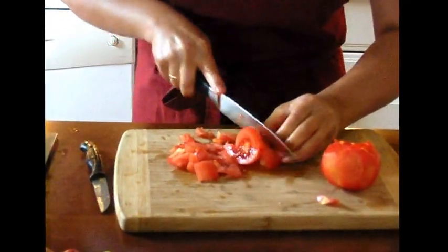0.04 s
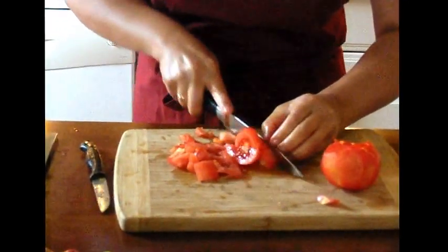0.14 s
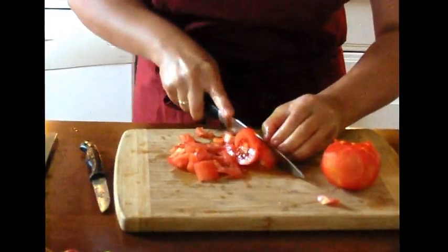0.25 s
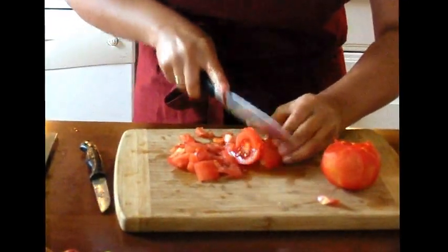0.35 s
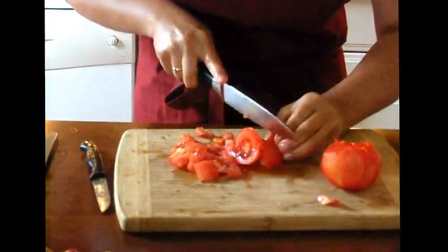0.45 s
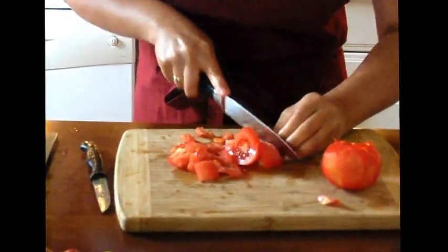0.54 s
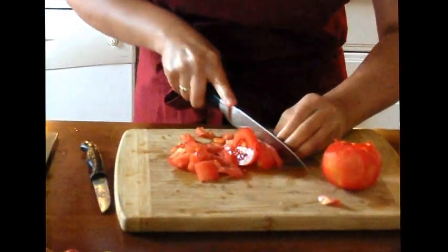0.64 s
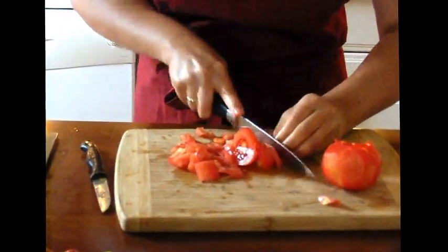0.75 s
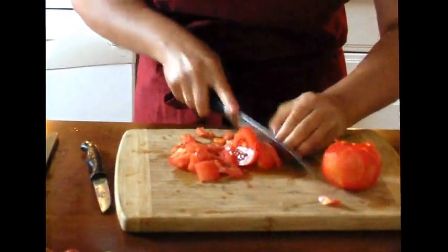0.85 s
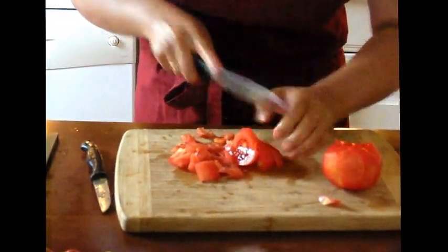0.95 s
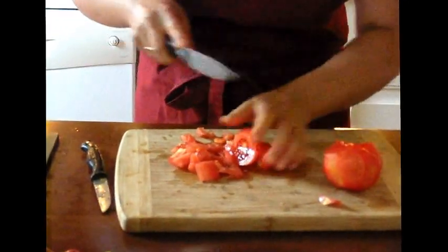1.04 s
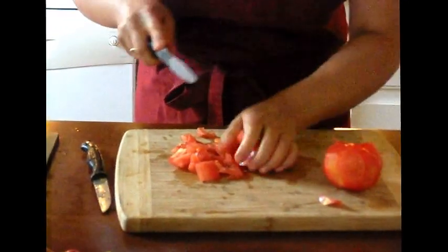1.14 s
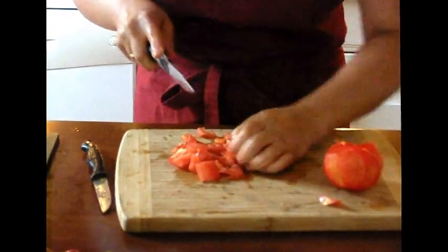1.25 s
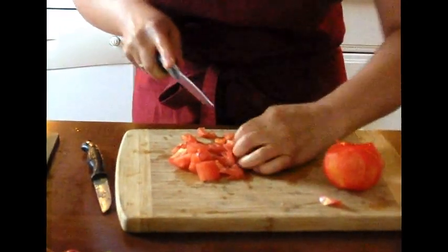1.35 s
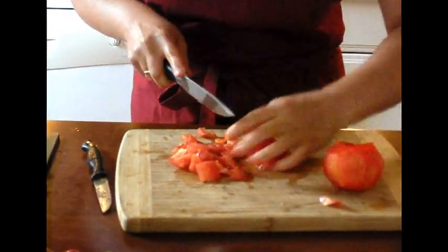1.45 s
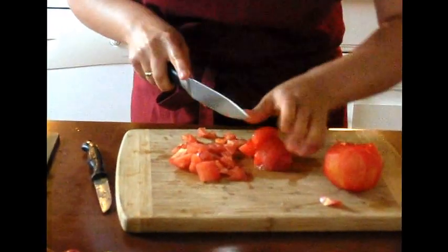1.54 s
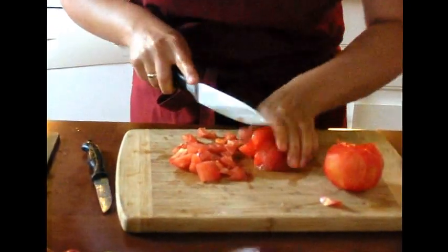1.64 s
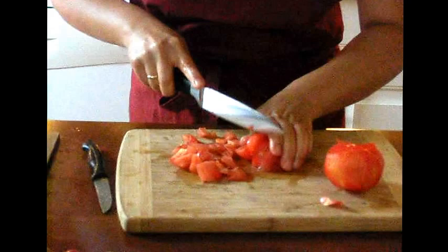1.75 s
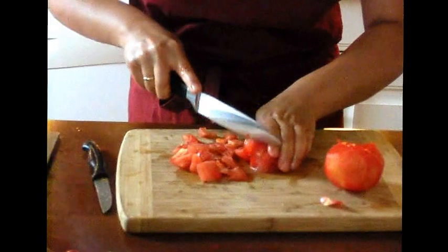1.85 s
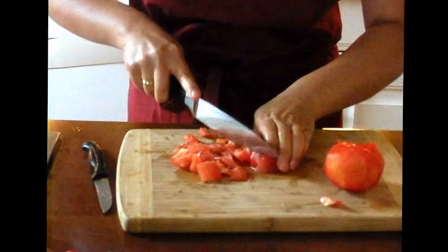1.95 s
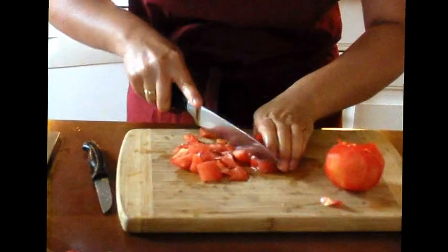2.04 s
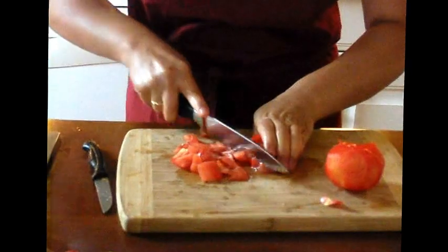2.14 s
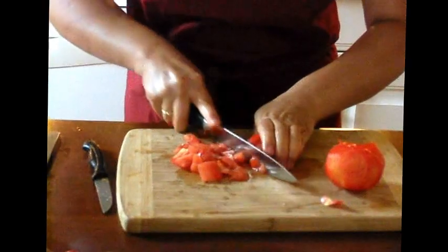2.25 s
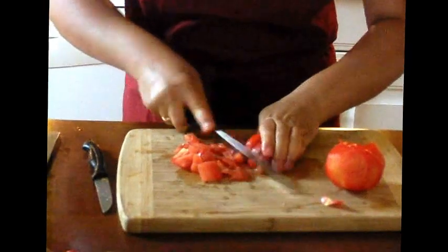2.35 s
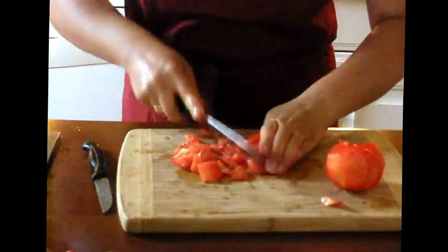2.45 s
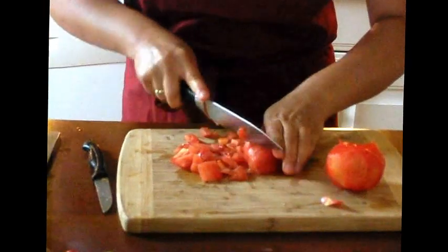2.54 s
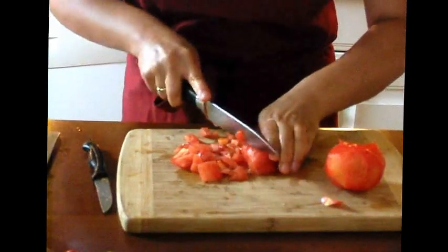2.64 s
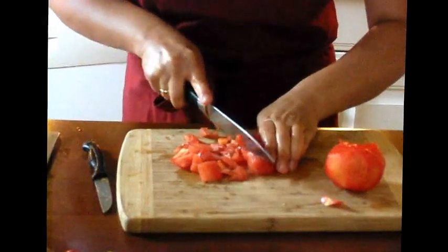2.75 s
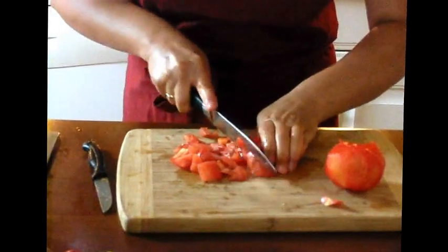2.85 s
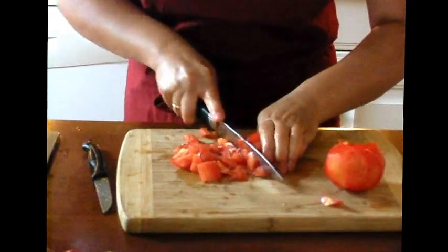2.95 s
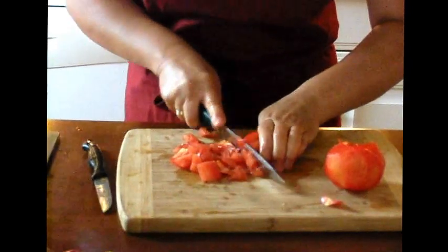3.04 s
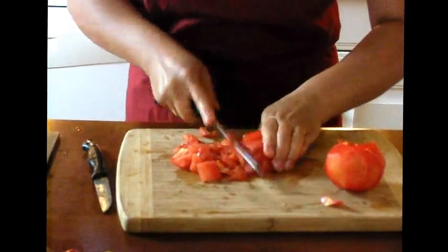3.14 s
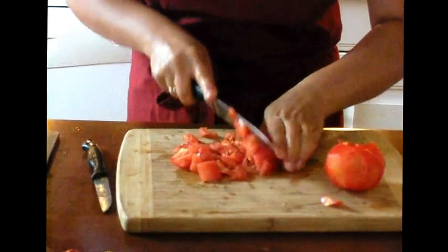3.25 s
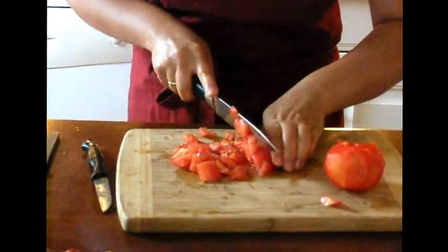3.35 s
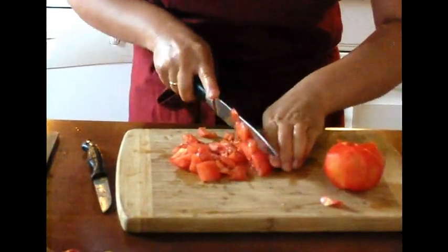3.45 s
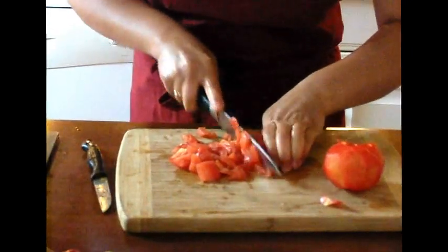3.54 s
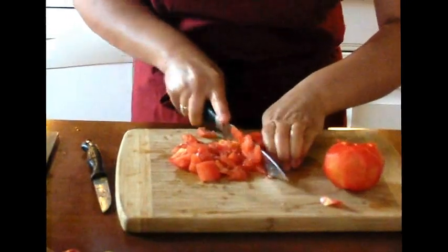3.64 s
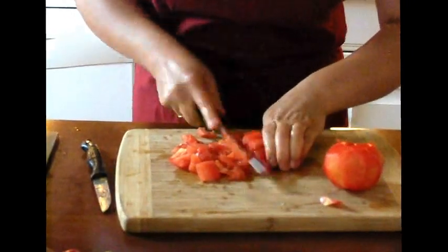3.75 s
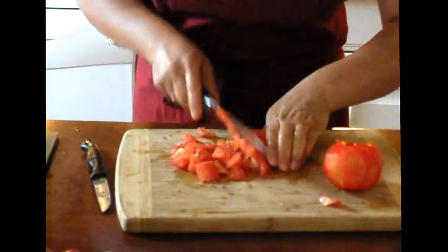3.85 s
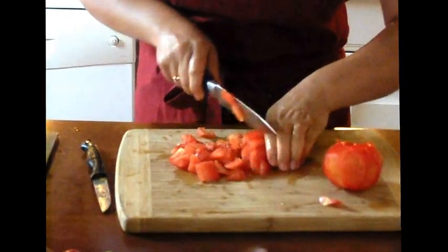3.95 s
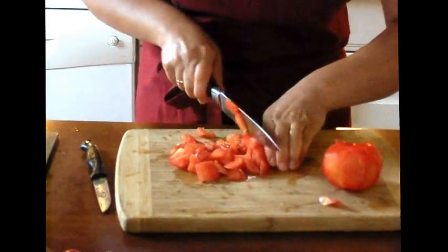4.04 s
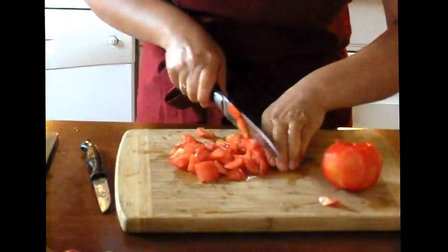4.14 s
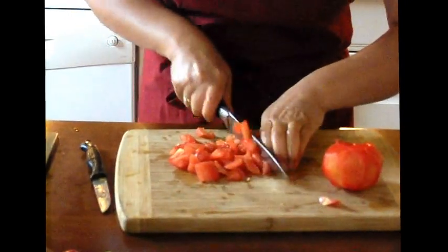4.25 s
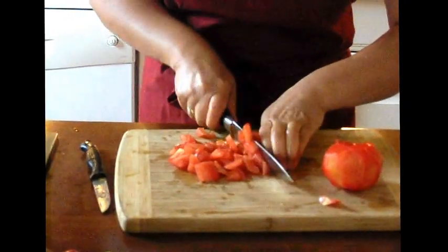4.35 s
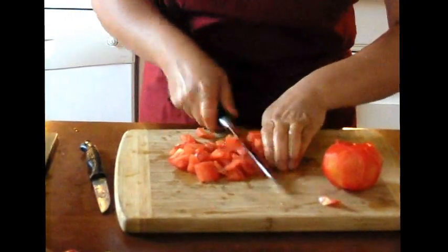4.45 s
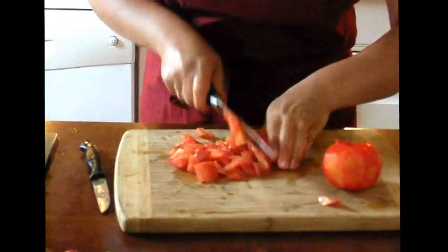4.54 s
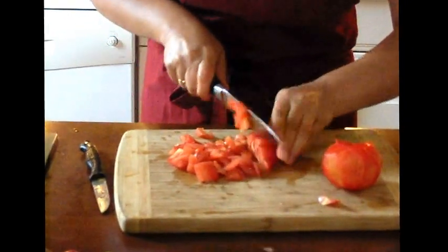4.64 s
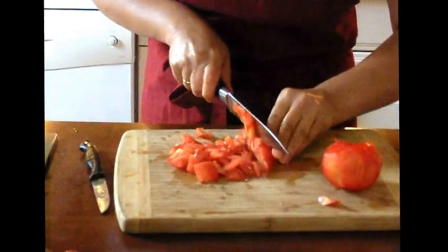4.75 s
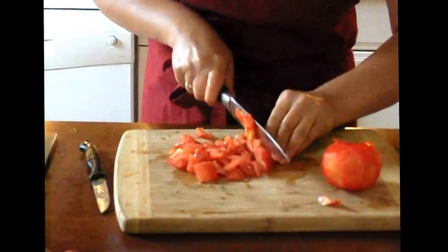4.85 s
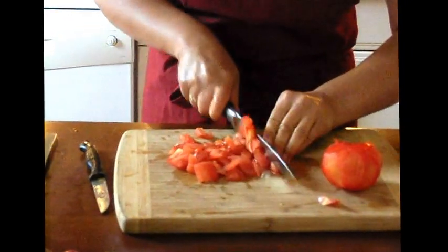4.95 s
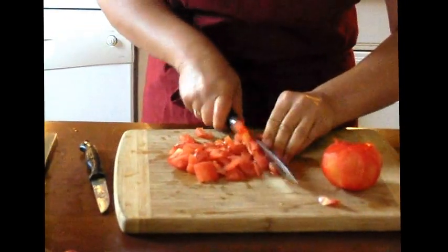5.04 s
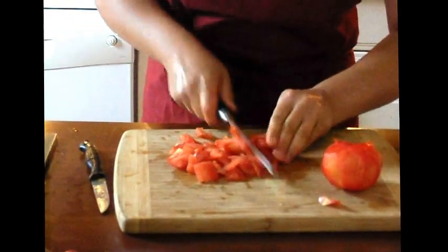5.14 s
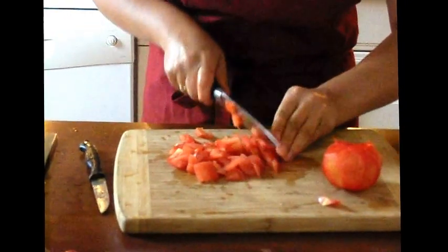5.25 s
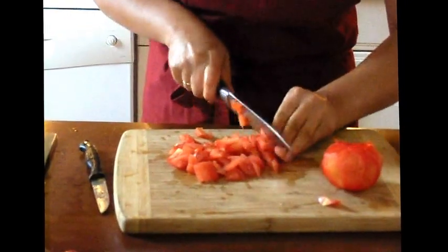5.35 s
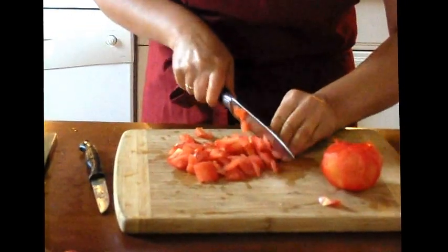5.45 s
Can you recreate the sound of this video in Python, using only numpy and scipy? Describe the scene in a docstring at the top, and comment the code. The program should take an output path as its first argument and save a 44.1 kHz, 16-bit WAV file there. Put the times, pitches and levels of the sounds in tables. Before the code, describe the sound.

A chef's knife dices a tomato on a wooden cutting board in a small, hard-walled kitchen. Each stroke is a brief wet rasp through skin and pulp, ending in a wooden knock that rings shortly in the room. The first knock, at about 0.2 seconds, is the loudest and brightest, with a tiny squeak of skin on steel. A duller one follows at 0.8 seconds. Then comes a pause with only faint wet sounds. Cutting resumes with a soft knock at 2.3 seconds, firmer ones at 3.0 and 3.7, and two quiet, cushioned ones at 4.4 and 5.1, the rasps growing slightly longer. Between strokes, juicy pieces peel off the blade with faint smacks, small pops and squeaks, the last around 5.2 seconds. A low steady rumble with a faint hiss lies underneath throughout.

```python
"""Dicing a tomato

A chef's knife cuts on a wooden board in a small, hard-walled kitchen. Each stroke rasps
through skin and pulp, then the edge knocks on the board; wet pieces smack as the blade
lifts. The room rings after every knock, over a low steady rumble."""
import sys
import numpy as np
from scipy import signal
from scipy.fft import rfft, irfft, next_fast_len
from scipy.io import wavfile
from scipy.ndimage import uniform_filter1d

SR = 44100
rng = np.random.default_rng(int(sys.argv[2]) if len(sys.argv) > 2 else 0)


def bounce(signal):
    """Save signal as a 16-bit WAV file at the path given by the first command-line argument."""
    frames = np.transpose(np.atleast_2d(signal))
    limited = np.clip(frames, -1, 1)
    pcm = np.round(limited * 32767).astype(np.int16)
    wavfile.write(sys.argv[1], SR, pcm)


N = 242682

# Edge meets board: (time [s], level [dB], cushion corner [Hz], board pitch [factor],
# blade flex [Hz], flex [dB], edge tick [dB], thump of the hand's weight [dB])
KNOCKS = [(0.2233, 0.5, 3800, 0.96, 2011, 1.5, -28.5, -14),
          (0.8077, -9, 1730, 0.89, 1934, 0.5, -35.5, -14.5),
          (2.3286, -15.5, 1274, 0.92, 1730, -6, -29, -23), (3.0270, -8.5, 1350, 0.92, 1615, -11, -36, -28),
          (3.704, -6, 1800, 0.92, 1378, -11, -35, -17), (4.389, -20.5, 1320, 0.906, 2840, 14, -28, -24),
          (5.0824, -19.5, 1170, 0.97, 1510, -31, -34, -23)]


def knocks(strike_db=30, tick_s=0.0015, tick_hz=6000, radiate_hz=230, thump_hz=270,
           worktop_db=-2, room_db=-1.5, tick_room_db=-9):
    """The edge strikes the board; pulp under it cushions the blow and cuts the treble."""
    # Board modes: (frequency before pitch factor [Hz], width [Hz], level [dB])
    board_modes = [(450, 100, -10.5), (591.4, 120, -4.5), (813, 121, 0.5), (956, 190, -13.5),
                   (1075, 90, -20), (1502, 130, -6), (1652, 120, -5), (1950, 207, -5.5), (2368, 26, -6.5),
                   (2599, 67, 1.5), (2600, 120, -0.5), (2872, 250, -3.5), (3360, 100, -3.5),
                   (3800, 290, -9.5), (4260, 240, -12), (4870, 500, -19)]
    # Board antiresonances: (frequency before pitch factor [Hz], width [Hz])
    board_nulls = [(1200, 87), (2210, 160)]
    # Worktop modes, driven by the board: (frequency [Hz], level [dB], T60 [s])
    worktop_modes = [(568, -66.5, .4), (620, -60, 0.31), (665, -45, 0.11), (736, -63.5, 0.21),
                     (760, -65.5, .5), (912, -61.5, 0.83), (1320, -70.5, 0.2), (1497, -59, 0.46),
                     (1619, -62.5, .4), (2426, -65, 0.19), (3140, -56.5, .3), (3250, -54.5, 0.12)]
    out, t = np.zeros(N), np.arange(SR // 2) / SR
    worktop = sum(amp(worktop_db + db - 60 * t / t60_s) * np.cos(2 * np.pi * hz * t)
                  for hz, db, t60_s in worktop_modes)
    radiation = signal.butter(1, radiate_hz, "high", fs=SR, output="sos")  # small board, little bass
    for s, db, corner_hz, pitch, flex_hz, flex_db, tick_db, thump_db in KNOCKS:
        # Adjacent modes alternate in sign: the knock swells over its first cycle.
        body = sum((-1) ** k * amp(mode_db) * ring(t, hz * pitch, width_hz)
                   for k, (hz, width_hz, mode_db) in enumerate(board_modes))
        body += amp(flex_db) * ring(t, flex_hz, width_hz=99)
        body += amp(thump_db) * ring(t, thump_hz, width_hz=136)
        body += signal.fftconvolve(body, worktop)[:len(t)]
        for hz, width_hz in board_nulls:
            body = signal.lfilter(*signal.iirnotch(hz * pitch, hz / width_hz, fs=SR), body)
        cushion = signal.butter(3, corner_hz, fs=SR, output="sos")
        wood = amp(db + strike_db) * signal.sosfilt(np.vstack([cushion, radiation]), body)
        grit = noise(len(t), lambda hz: hump(hz, tick_hz, octaves=0.76))
        tick = amp(db + tick_db) * grit * swell(t, tick_s)
        add(out, s, wood + tick)
        send = amp(room_db) * wood + amp(tick_room_db) * tick
        add(out, s, signal.fftconvolve(send, kitchen()))  # each spot has its own echoes
    return out


def slicing(level_db=-1, skin_hz=12500, skin_db=5, pulp_db=-7, dulling_s=0.06, bite_s=0.019,
            ease_db_per_s=131, stop_db_per_s=229.5, uneven_db=0.74, uneven_hz=60.3):
    """Skin snaps, then cells burst in a rasp that grows and dulls with depth until the board stops it."""
    # Cut before each knock: (length [s], deepest point [fraction], deepest rasp [dB], entry rasp [dB],
    # skin snap [dB], scrape of skin on steel [Hz], scrape width [octaves], scrape gain [dB])
    cuts = [(0.1, 1, -38.5, -69, -72, 2940, .3, -3), (0.075, 1, -46.5, -65, -68, 6600, .33, -2.5),
            (.092, 1, -43.5, -56.5, -63, 20000, .47, -1), (.125, 0.76, -41.5, -64, -68, 11200, 0.15, -2),
            (.133, .8, -43, -55.5, -53, 7300, 0.28, 4), (.145, 0.61, -41, -55, -57, 3200, 0.29, 4.5),
            (.158, 0.58, -39.5, -58, -62, 5700, 0.18, 5)]
    # Rasp spectrum: (frequency [Hz], gain [dB])
    rasp_colour = [(400, 7.5), (1200, 0), (2500, -1), (4500, -2.5), (7000, -1), (10000, -4), (12000, -8),
                   (15500, -8.5)]
    out, t = np.zeros(N), np.arange(SR // 3) / SR
    bursts = crackle(per_s=5000, spread_db=2.5, cycles=13, fizz=0.99)
    for (knock_s, *_), cut in zip(KNOCKS, cuts):
        length_s, depth, deep_db, entry_db, snap_db, scrape_hz, octaves, scrape_db = cut
        start_s, deepest_s = knock_s - length_s, depth * length_s
        cells = patchy(bursts[rng.integers(N - len(t)):][:len(t)])
        colour = lambda hz: amp(read(rasp_colour, hz) + scrape_db * hump(hz, scrape_hz, octaves))
        rasp = unit(shaped(cells, colour))
        treble = shaped(rasp, lambda hz: hump(hz, skin_hz, octaves=0.47))
        treble_db = np.interp(t, [0, deepest_s, deepest_s + dulling_s], [skin_db, 0, pulp_db])
        rasp += treble * (amp(treble_db) - 1)
        db = np.interp(t, [0, deepest_s], [entry_db, deep_db])
        db -= ease_db_per_s * np.maximum(t - deepest_s, 0)  # blade through
        db -= stop_db_per_s * np.maximum(t - length_s, 0)  # blade on the board
        db += uneven_db * noise(len(t), lambda hz: np.exp(-(hz / uneven_hz) ** 2))  # flesh yields in fits
        add(out, start_s, rasp * amp(level_db + db) * np.minimum(t / bite_s, 1))
        add(out, start_s, smack(bursts, snap_db, skin_hz, octaves=0.46, length_s=0.05))
    return out


def juice(level_db=-1, pop_octaves=0.496, pop_s=0.0077,
          stray_per_s=2.5, stray_db=-65, stray_spread_db=1.5, stray_hz=10500):
    """Juice films snap, bubbles burst and wet skin squeaks as pieces stick to the blade and let go."""
    # Wet flesh peels off blade or board: (peak time [s], level [dB], centre [Hz], length [s])
    peels = [(.68, -56.5, 9050, .036), (1.339, -62, 6020, .16), (2.487, -51, 6000, .07),
             (2.887, -56.5, 8500, 0.049), (3.214, -50, 5500, .045), (3.876, -48.5, 7350, .022),
             (4.568, -50.5, 5820, .024), (5.228, -50.5, 6970, 0.029)]
    # Stick-slip of skin on steel: (peak time [s], level [dB], centre [Hz], length [s])
    squeaks = [(.219, -33, 2760, 0.022), (2.491, -49, 7530, .03), (3.22, -58.5, 9450, .05),
               (3.675, -52, 7800, 0.017), (3.65, -51, 1890, .15), (4.575, -53, 2010, 0.043),
               (4.972, -53, 14000, .045), (5.237, -53, 2195, .06)]
    # Loudest bubbles: (peak time [s], level [dB], centre [Hz])
    pops = [(.388, -44, 5900), (0.624, -57, 10000), (1.683, -59, 10100), (2.603, -59.5, 13900),
            (2.894, -54, 7000), (3.197, -49, 7500), (3.293, -62, 12450), (3.84, -48.5, 5900),
            (4.535, -54, 12500), (5.174, -48, 6760), (5.192, -48, 7460)]
    out = np.zeros(N)
    bursts = crackle(per_s=3600, spread_db=-1.5, cycles=15, fizz=0.45)
    for events, octaves in (peels, 1.56), (squeaks, 0.13):
        for s, db, hz, length_s in events:
            add(out, s - length_s / 2, smack(bursts, db, hz, octaves, length_s))
    for s, db, hz in pops:
        add(out, s - pop_s / 2, smack(bursts, db, hz, pop_octaves, pop_s))
    chances = rng.random((48, 2))  # fainter bubbles burst at random
    for (when, luck), (size, pitch) in zip(chances, rng.standard_normal(chances.shape)):
        hz = stray_hz * 2 ** (pitch * pop_octaves / 2)
        pop = smack(bursts, stray_db + stray_spread_db * size, hz, pop_octaves, pop_s)
        if luck * len(chances) < stray_per_s * N / SR:
            add(out, when * N / SR, pop)
    return amp(level_db) * out


def smack(bursts, db, centre_hz, octaves, length_s):
    """Short swell of wet crackle in one band, loudest midway."""
    # Dulling by wet pulp: (frequency [Hz], gain [dB])
    pulp_colour = [(2000, 10), (8000, -2.5), (11000, -3), (15500, -6)]
    piece = bursts[rng.integers(N - SR // 4):][:SR // 4]
    band = shaped(piece, lambda hz: hump(hz, centre_hz, octaves) * amp(read(pulp_colour, hz)))
    envelope = signal.windows.hann(int(length_s * SR))
    snap = band[:len(envelope)] * envelope
    return amp(db) * snap * np.linalg.norm(envelope) / np.linalg.norm(snap)


def crackle(per_s, spread_db, cycles, fizz):
    """Tiny cells and bubbles pop, each ringing briefly at its own pitch, over a fine fizz."""
    pops, t = np.zeros(N), np.arange(SR // 100) / SR
    pitches_hz = np.geomspace(1200, 16000, 36)
    for hz in pitches_hz:
        when, size, sign, luck = rng.random((4, N // 50))
        popping = luck * len(luck) < per_s * N / SR * hz / pitches_hz.sum()  # small bubbles are commonest
        gains = amp(spread_db * np.minimum(-np.log1p(-size), 4)) * np.sign(sign - 0.5)
        pop = unit(ring(t, hz, hz / cycles))
        indices = (when[popping, None] * (N - len(t))).astype(int) + np.arange(len(t))
        pops += np.bincount(indices.ravel(), np.outer(gains[popping], pop).ravel(), N)
    return unit(unit(pops) + fizz * rng.standard_normal(N))


def patchy(x, patch_db=2.5):
    """Cells burst in clumps: the colour shifts in patches of about 1 kHz by 20 ms."""
    spectra = signal.stft(x, nperseg=256)[2]
    patches = uniform_filter1d(rng.standard_normal(spectra.shape), size=6, axis=0)
    patches = uniform_filter1d(patches, size=7, axis=1)
    return signal.istft(spectra * amp(patch_db * unit(patches)), nperseg=256)[1][:len(x)]


def kitchen(taps_per_s=6000, near_db=-6, wall_s=0.0115, counter_s=0.0049, counter_db=-20):
    """Room response: counter echo and faint near scatter, then the walls' diffuse tail."""
    # Room decay: (frequency [Hz], T60 [s])
    room_t60 = [(200, 0.67), (700, 0.58), (1500, 0.57), (3500, 0.62), (6000, 0.52), (10000, 0.58),
                (15000, 0.24)]
    # Tail spectrum: (frequency [Hz], gain [dB])
    room_colour = [(150, 5.5), (450, -3), (750, -5.5), (1050, 1), (1600, 1), (2800, -3), (4500, 3),
                   (8000, -5), (15000, -2)]
    t = np.arange(SR) / SR
    taps = rng.choice([-1., 1.], SR) * (rng.random(SR) < taps_per_s / SR)
    taps *= np.where(t < wall_s, amp(near_db) * np.sqrt(t / wall_s), 1)
    bin_hz, frame_s, spectra = signal.stft(taps, SR, nperseg=256)
    decay = amp(-60 * frame_s / read(room_t60, bin_hz)[:, None])
    tail = signal.istft(spectra * decay, SR, nperseg=256)[1]
    tail = shaped(tail / np.linalg.norm(tail), lambda hz: amp(read(room_colour, hz)))
    add(tail, counter_s, amp([counter_db]))
    return tail


def background(level_db=-45, whine_hz=7870, whine_db=4):
    """Steady low rumble and hiss, with a faint high whine."""
    # Noise spectrum: (frequency [Hz], relative density [dB])
    floor_colour = [(12, -11.5), (20, 2), (104, -5), (137, -6), (172, -7), (203, -8.5), (261, -10),
                    (419, -14.5), (620, -18), (693, -18.5), (1250, -27), (3220, -36), (3800, -39),
                    (10400, -46), (15800, -48)]
    colour = lambda hz: amp(read(floor_colour, hz) + whine_db * hump(hz, whine_hz, octaves=0.011))
    return amp(level_db) * noise(N, colour)


def ring(t, hz, width_hz):
    """Struck mode; spectral peak independent of width."""
    return 2 * np.pi * width_hz / SR * np.exp(-np.pi * width_hz * t) * np.cos(2 * np.pi * hz * t)


def swell(t, peak_s):
    """Rise to 1 at peak_s, then exponential fall."""
    return t / peak_s * np.exp(1 - t / peak_s)


def noise(samples, gain):
    """Noise coloured by gain(hz), rms 1."""
    return unit(shaped(rng.standard_normal(samples), gain))


def shaped(x, gain):
    """Filter x by gain(hz)."""
    size = next_fast_len(len(x))
    return irfft(rfft(x, size) * gain(np.fft.rfftfreq(size, 1 / SR)), size)[:len(x)]


def hump(hz, centre_hz, octaves):
    """Bell of height 1 over log frequency."""
    return np.exp(-0.5 * (np.log2((hz + 1) / centre_hz) / octaves) ** 2)


def read(points, hz):
    """Interpolate a table over log frequency."""
    points_hz, values = np.transpose(points)
    return np.interp(np.log(hz + 1), np.log(points_hz + 1), values)


def amp(db):
    """Decibels to gain."""
    return 10 ** (np.asarray(db) / 20)


def unit(x):
    """Scale to rms 1."""
    return x / np.sqrt(np.mean(x ** 2) + 1e-20)


def add(mix, start_s, sound):
    """Mix a sound in at start_s."""
    part = mix[max(round(start_s * SR), 0):][:len(sound)]
    part += sound[:len(part)]


def scene(tomato_room_db=-2):
    """Board and tomato in one room, mono."""
    tomato = slicing() + juice()
    echo = amp(tomato_room_db) * signal.fftconvolve(tomato, kitchen())[:N]
    return (knocks() + tomato + echo + background())[None]


def record(dry):
    """Clip at full scale, then low-pass at 15.9 kHz."""
    lowpass = signal.firwin(511, 15900, window=("kaiser", 9), fs=SR)
    return signal.oaconvolve(np.clip(dry, -1, 1), lowpass[None], "same")


dry = scene()
out = record(dry)
bounce(out)
```